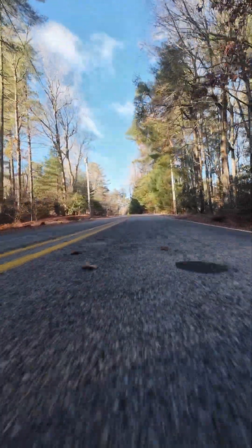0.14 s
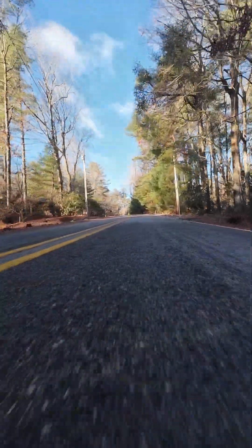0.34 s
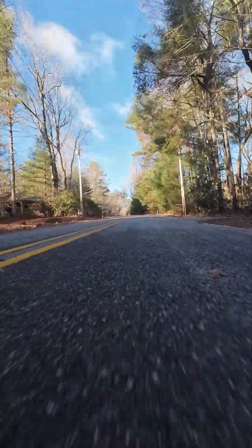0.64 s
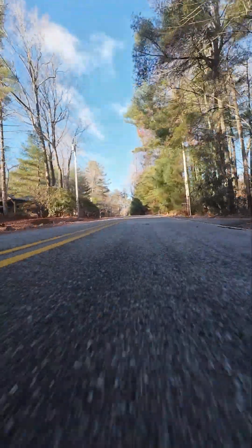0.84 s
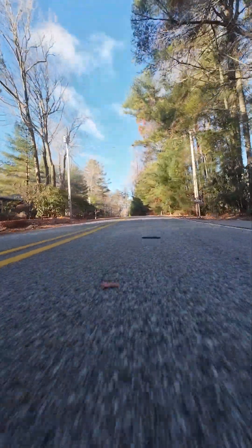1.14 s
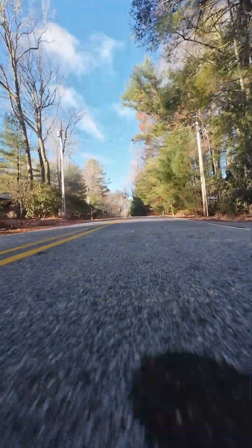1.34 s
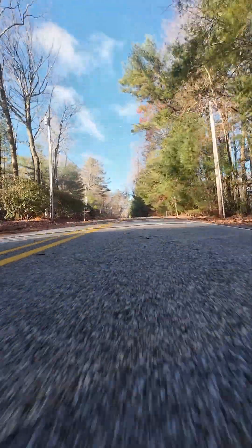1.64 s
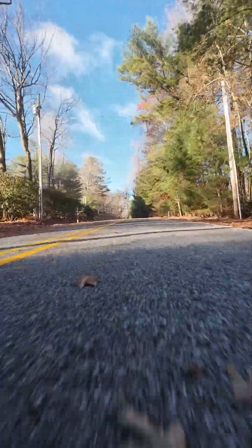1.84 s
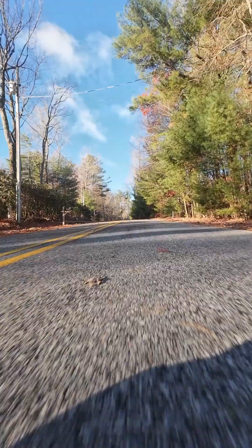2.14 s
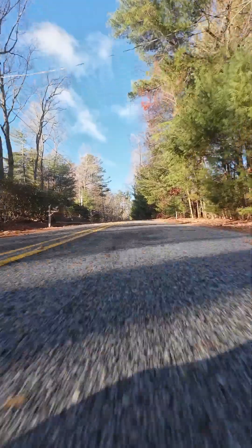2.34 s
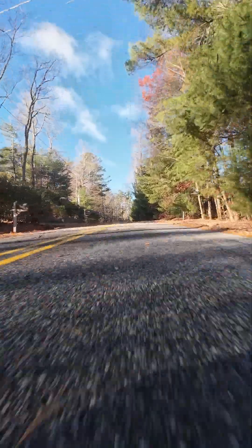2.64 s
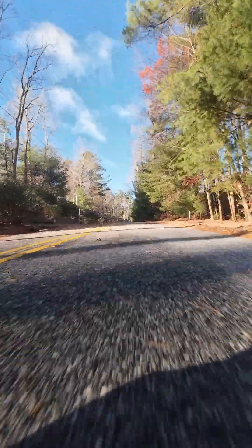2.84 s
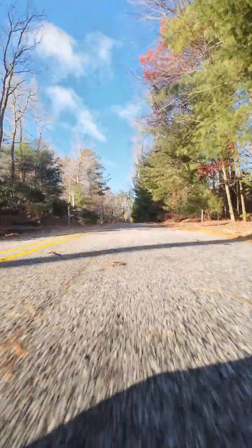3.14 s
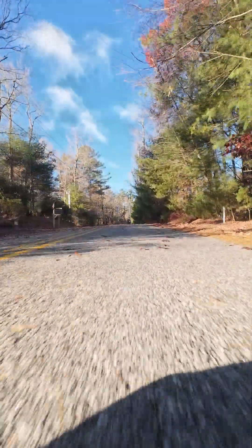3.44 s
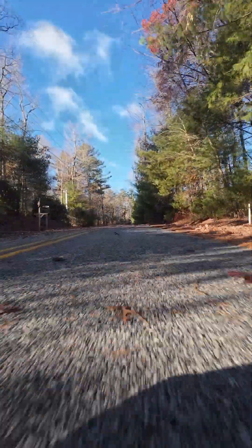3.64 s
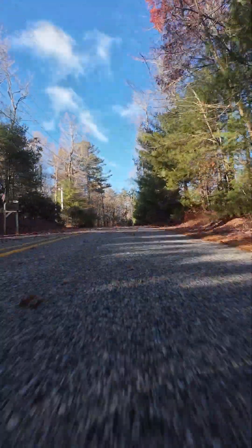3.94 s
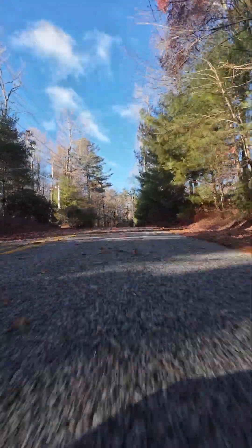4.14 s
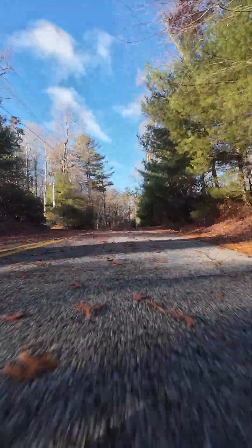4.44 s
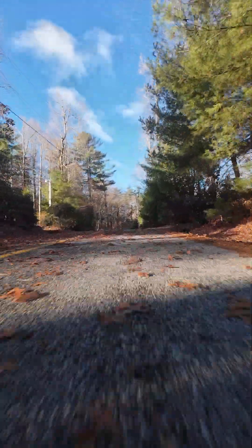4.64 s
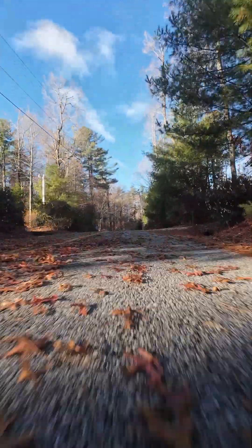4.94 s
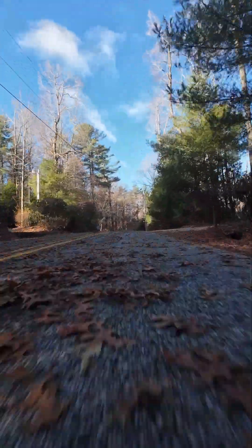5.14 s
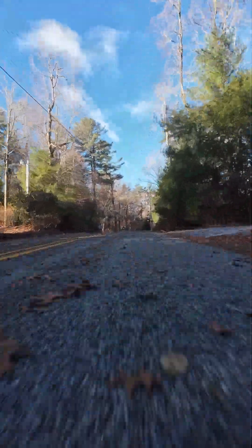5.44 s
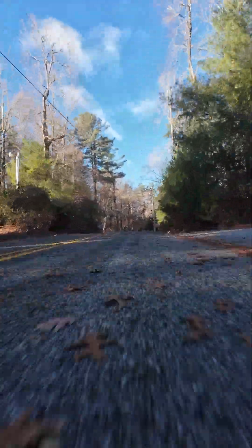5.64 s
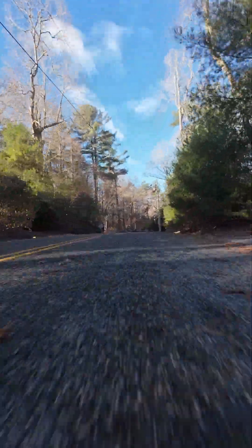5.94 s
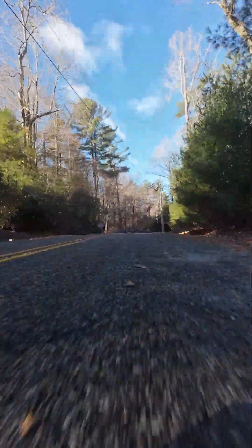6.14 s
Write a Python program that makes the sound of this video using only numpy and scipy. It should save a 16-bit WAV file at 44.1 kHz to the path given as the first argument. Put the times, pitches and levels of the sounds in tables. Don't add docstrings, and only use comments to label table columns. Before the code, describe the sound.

Very close, outdoor sound of a V8 car on coarse asphalt. Off throttle, its low exhaust hum sits behind rumbling tyres; a quick blip swells and vanishes, then the throttle opens and a warm, slightly uneven growl holds steady. Gas rasps softly at the tips. Scattered crisp leaf rustles and tiny panel ticks pepper the foreground over light gusty hiss.

```python
import sys
import numpy as np
from scipy import signal
from scipy.io import wavfile
from scipy.ndimage import uniform_filter1d

SR = 44100
rng = np.random.default_rng(int(sys.argv[2]) if len(sys.argv) > 2 else 0)


def log_audio(samples):
    frames = np.atleast_2d(samples).T
    limited = np.clip(frames, -1, 1)
    pcm = np.round(limited * 32767).astype(np.int16)
    wavfile.write(sys.argv[1], SR, pcm)


def boost(x):
    u = np.asarray(x, float) / 20
    return 10 ** u


N = 276948


def curve(table, column):
    rows = np.array(table)
    return np.interp(np.arange(N) / SR, rows[:, 0], rows[:, column])


def unit(x):
    return x / np.sqrt(np.mean(x ** 2))


def ring(x, hz, width_hz):
    return signal.lfilter(*signal.iirpeak(hz, hz / width_hz, SR), x)


def ring_twice(x, hz, width_hz):
    return ring(ring(x, hz, width_hz), hz, width_hz)


def edge(x, hz, kind, order=2):
    return signal.sosfilt(signal.butter(order, min(hz, SR / 2.2), kind, fs=SR, output="sos"), x)


def clicks(seconds, sizes):
    place = np.clip(seconds * SR, 0, N)
    whole = place.astype(int)
    part = place - whole
    out = np.bincount(whole, sizes * (1 - part), N + 2)
    return (out + np.bincount(whole + 1, sizes * part, N + 2))[:N]


def walk(rate_hz):
    hold = int(SR / rate_hz)
    steps = np.repeat(rng.standard_normal(N // hold + 1), hold)
    return unit(uniform_filter1d(uniform_filter1d(steps, hold), hold)[:N])


def warmed(x, clock):
    return np.interp(clock, np.arange(N), x)


# (time [s], firing rate [Hz])
REVS_HZ = [(0.0, 153.78), (0.821, 150.11), (1.016, 147.37), (1.151, 158.35), (1.195, 158.09),
           (1.337, 143.94), (1.511, 149.49), (1.643, 151.15), (1.943, 147.97), (2.086, 150.31),
           (2.353, 146.79), (2.717, 148.58), (2.798, 148.07), (3.45, 150.95), (4.219, 154.17),
           (5.3, 157.63), (6.28, 159.51)]


def firing_hz():
    return curve(REVS_HZ, 1)


# (time [s], exhaust level [dB])
THROTTLE_DB = [(0, -32), (.45, -32), (.7, -28), (1, -28.5), (1.07, -19.5), (1.14, -14.5), (1.21, -18),
               (1.35, -30), (1.42, -32), (1.65, -26), (1.85, -28), (2.1, -21), (2.4, -21), (2.8, -18.5),
               (4.35, -18.5), (5.4, -19.5), (6.15, -20.5), (6.28, -22)]


def exhaust_db():
    return curve(THROTTLE_DB, 1)


SHUT_DB, OPEN_DB = -27, -21


def load():
    return np.clip((exhaust_db() - SHUT_DB) / (OPEN_DB - SHUT_DB), 0, 1)


def steady_load(average_s=.6):
    return uniform_filter1d(load(), int(average_s * SR))


# (pipe [0/1], blow under load [dB], blow coasting [dB], header delay [ms], header echo [ms])
CYLINDERS = [(1.0, -4.55, 0.74, 0.99, 6.47), (0.0, -1.54, -8.67, 0.35, 5.05),
             (1.0, 4.56, -1.82, 0.71, 5.11), (1.0, -7.56, 7.6, 1.29, 6.18), (0.0, 4.05, 8.1, 0.5, 7.5),
             (1.0, -0.08, -19.97, 1.72, 4.82), (0.0, -2.23, 0.41, -0.18, 5.63),
             (0.0, 7.35, 13.63, 0.6, 6.69)]


def blowdowns(scatter_db=.3, jitter_ms=.008, first_firing=.4546):
    t = np.arange(N) / SR
    turns = np.cumsum(firing_hz()) / SR - first_firing
    firing = np.arange(int(turns[-1]))
    start_s = np.interp(firing, turns, t)
    pull = np.interp(start_s, t, load())
    pipe, load_db, coast_db, delay_ms, echo_ms = np.array(CYLINDERS)[firing % 8].T
    chance = rng.standard_normal((2, len(firing)))
    size = boost(coast_db + pull * (load_db - coast_db) + scatter_db * chance[0])
    cool_lag_ms, hot_lag_ms = -4.89, -5.22
    lag_ms = cool_lag_ms + pull * (hot_lag_ms - cool_lag_ms)
    arrive_s = start_s + (delay_ms + lag_ms + jitter_ms * chance[1]) / 1000
    echo_coast, echo_load = -.51, -.74
    echo = echo_coast + pull * (echo_load - echo_coast)
    times_s = np.concatenate([arrive_s, arrive_s + echo_ms / 1000])
    return times_s, np.concatenate([size, echo * size]), np.concatenate([pipe, pipe])


def warm_clock():
    warm_per_s, warm_from_s, neutral_s = .0044, 2.6, 3.6
    t = np.arange(N) / SR
    return np.cumsum(1 + warm_per_s * (np.maximum(t, warm_from_s) - neutral_s))


def growl_level_db(settle_samples):
    below_hz = np.minimum(firing_hz() - 152.14, 0)
    rise_db = 1.8 * below_hz + 2.5 * (1 - steady_load())
    return 1 + uniform_filter1d(rise_db, settle_samples)


def bark_level_db(settle_samples):
    level_db = exhaust_db()
    return 1 - 1.74 * np.abs(level_db - uniform_filter1d(level_db, settle_samples))


# (centre [Hz], width [Hz], signed share in pipe 0, signed share in pipe 1)
PIPES = [(85.0, 20.0, -0.019, 0.02), (86.0, 107.0, -0.052, -0.036), (151.0, 27.0, -1.0, -0.525),
         (162.0, 51.0, 0.8, 0.324), (195.0, 42.0, -0.111, 0.084), (255.0, 60.0, -0.013, -0.167),
         (305.0, 29.0, 0.045, 0.204), (332.0, 19.0, -0.197, -0.23), (385.0, 14.0, -0.047, 0.029),
         (467.0, 55.0, -0.238, -0.158), (474.0, 65.0, 0.208, 0.157), (581.0, 78.0, 0.022, -0.025),
         (611.0, 15.0, -0.025, 0.109), (659.0, 13.0, 0.038, -0.048), (711.0, 43.0, -0.013, -0.056),
         (720.0, 282.0, -0.017, 0.116), (732.0, 46.0, 0.031, 0.02), (780.0, 282.0, 0.002, -0.117),
         (786.0, 35.0, -0.091, 0.35), (791.0, 32.0, 0.054, -0.275), (882.0, 35.0, 0.017, -0.007),
         (903.0, 105.0, 0.013, 0.019), (1004.0, 39.0, 0.011, -0.067), (1010.0, 47.0, -0.004, 0.071),
         (1135.0, 140.0, 0.001, -0.009), (1213.0, 25.0, 0.002, 0.006), (1263.0, 282.0, -0.001, 0.004),
         (1366.0, 19.0, -0.005, 0.005), (1549.0, 24.0, 0.003, -0.004)]


def engine(flow=.002, settle_s=.21):
    times_s, strength, pipe = blowdowns()
    clock = warm_clock()
    hot_s = np.interp(times_s * SR, np.arange(N), clock) / SR
    rush = np.array([clicks(hot_s, strength * (pipe == k)) for k in range(2)])
    rush = rush + flow * rng.standard_normal((2, N))
    modes = [(hz, ring(a * rush[0] + b * rush[1], hz, width_hz)) for hz, width_hz, a, b in PIPES]
    boom = warmed(sum(mode for hz, mode in modes if hz < 430), clock)
    growl = sum(mode for hz, mode in modes if 430 < hz < 640)
    bark = sum(mode for hz, mode in modes if 640 < hz < 950)
    snarl_db = 2.0 + .49 * (exhaust_db() - OPEN_DB)
    snarl = boost(snarl_db) * sum(mode for hz, mode in modes if hz > 950)
    settle_samples = int(settle_s * SR)
    upper = boost(growl_level_db(settle_samples)) * growl
    upper = upper + boost(bark_level_db(settle_samples)) * (bark + snarl)
    pipes = edge(boom + warmed(upper, clock), 1700, "low", order=4)
    boom_power = uniform_filter1d(boom ** 2, size=SR // 6)
    return (pipes / np.sqrt(boom_power) + gas(clicks(times_s, strength))) * boost(exhaust_db())


def gas(blows, gas_db=-37, puff_s=.0014):
    fronts = np.maximum(blows, 0)
    noise = rng.standard_normal(N)
    puff = unit(signal.lfilter([1], [1, -np.exp(-1 / (puff_s * SR))], fronts) * noise)
    rasp = puff + .49 * unit(fronts)
    throat = 1.73 * ring_twice(rasp, 1420, 380) + 1.7 * ring_twice(rasp, 1120, 280)
    whistle_db = -.23 * np.maximum(firing_hz() - 152.9, 0)
    whistle = .5 * boost(whistle_db) * ring_twice(noise + .4 * puff, 2350, 500)
    haze = .1 * boost(-.5 * steady_load()) * ring_twice(rasp, 2900, 700)
    return boost(gas_db) * unit(edge(throat, 1400, "low") + whistle + haze)


def coloured(spectrum, lo_hz, count, flicker_db):
    hz, db = np.transpose(spectrum)
    out = 0
    for centre_hz in lo_hz * 2 ** (np.arange(count) / 3):
        band = ring_twice(rng.standard_normal(N), centre_hz, centre_hz / 3)
        band_db = np.interp(np.log(centre_hz), np.log(hz), db)
        out = out + boost(band_db + flicker_db * walk(6.1)) * band
    return unit(out)


# (frequency [Hz], density [dB per Hz])
ROAD = [(20, -3), (40, 0), (58, 6.5), (90, -6), (160, -5), (320, -1), (500, -11), (800, -10), (1150, -15),
        (1500, -26), (1900, -46), (2400, -35), (3500, -43), (7000, -58)]


def tyre_roar():
    roll_db = -42.5 + .8 * walk(3.5)
    common = boost(roll_db) * coloured(ROAD, 22, count=26, flicker_db=.7)
    apart = boost(-64.5) * coloured(ROAD[4:], 300, count=11, flicker_db=1.)
    return common + apart * np.array([[1], [-1]])


# (frequency [Hz], density [dB per Hz])
HISS = [(1650, -30), (2800, 2), (4010, -20), (5230, -16.5), (6920, -10), (8110, -4), (12900, -10),
        (15600, -20)]


def wind_hiss(level_db=-87.5):
    return boost(level_db) * coloured(HISS, 2200, count=8, flicker_db=7.5)


# (centre [s], half length [s], rustle [dB])
DRIFTS = [
    (0.402, 0.76, -79.5),
    (1.602, 0.23, -90.5),
    (2.298, 0.41, -83.5),
    (3.552, 0.44, -76),
    (5.301, .5, -76),
    (6.144, .3, -71.5),
]


def rustle_level_db(bare_db=-84.5):
    t = np.arange(N) / SR
    swells = sum(boost(db) * np.exp(-((t - s) / half_s) ** 2) for s, half_s, db in DRIFTS)
    return 20 * np.log10(boost(bare_db) + swells)


# (start [s], length [s], level [dB], brightness above 9 kHz [dB])
LEAVES = [(0, 0.036, -61, -8.5), (0.228, 0.043, -65.5, -7), (0.316, 0.022, -71, -7.5),
          (0.516, 0.021, -70.5, -2.5), (0.566, 0.03, -73.5, -0.5), (0.839, .055, -73.5, -6),
          (1.351, 0.015, -69.5, -5.5), (1.436, .024, -70.5, -2.5), (1.499, 0.023, -65, -3),
          (1.652, .095, -72, -2), (1.806, 0.05, -65.5, -7.5), (2.11, 0.031, -64, -7.5),
          (2.305, 0.046, -66, -8.5), (2.41, 0.019, -56.5, -7.5), (2.476, 0.018, -67.5, -8),
          (3.092, .035, -67, -17), (2.691, .055, -69.5, -11), (3.355, .2, -69.5, -9),
          (3.562, 0.033, -73.5, -6), (3.692, 0.043, -65, -9.5), (3.822, 0.022, -60, -9),
          (4.041, 0.037, -64, -7), (4.888, 0.059, -64.5, -6), (5.376, 0.019, -69.5, -6),
          (5.529, 0.02, -71.5, -5), (5.943, 0.035, -67, -3), (5.814, .08, -70, -5),
          (5.998, .05, -59.5, -10), (6.109, .06, -64.5, -6.5), (6.207, .07, -63, -8)]


def leaves(rustle_db, gain_db=-1, crush_s=.003, settle_s=.012):
    size_db = np.minimum(3.5 * rng.exponential(1, N), 12)
    grains_per_s = 3000
    grains = (rng.random(N) < grains_per_s / SR) * boost(size_db) * rng.standard_normal(N)
    grains = unit(unit(grains) + .38 * rng.standard_normal((2, N)))
    dull, bright = np.zeros(N), np.zeros(N)
    t = np.arange(N) / SR
    for s, length_s, db, bright_db in LEAVES:
        near = slice(max(int(s * SR) - SR // 50, 0), int((s + length_s) * SR) + SR // 20)
        age_s = t[near] - s
        attack = np.minimum(age_s, 0) / crush_s
        decay = np.maximum(age_s - length_s, 0) / settle_s
        spray = boost(db + gain_db) * np.exp(attack - decay)
        dull[near] += spray
        bright[near] += boost(bright_db) * spray
    rustle = boost(rustle_db + 2.5 * walk(27))
    patchy = boost(2.2 * walk(150))
    apart = .25 * rng.standard_normal((2, N))
    low = (dull * patchy + rustle) * grains
    body = .9 * ring(low, 3200, 1800) + ring(low, 5200, 2200) + .6 * ring(low, 8300, 2500)
    high = (bright * patchy + .4 * rustle) * (grains + apart)
    air = edge(edge(high, 8500, "high"), 11500, "low")
    return 1.165 * edge(body, 6300, "low") - 2.0 * air


def pebbles(rustle_db, per_s=25, over_db=6, spread_db=5.5):
    when, size, tone = rng.random((int(per_s * N / SR), 3)).T
    s = (np.arange(len(when)) + when) / per_s
    excess = np.minimum(-np.log(1 - size), 3)
    peak_db = rustle_db[(s * SR).astype(int)] + over_db + spread_db * excess
    return list(zip(s, peak_db, 3000 * 1.3 ** tone))


# (time [s], peak [dB], ring [Hz])
STONES = [(0.0947, -48, 3250), (0.1506, -56, 3460), (0.2798, -56.5, 3790), (0.5233, -53.5, 4120),
          (0.7077, -57, 3010), (1.4968, -47.5, 3270), (1.546, -40, 3250), (1.6999, -43, 3040),
          (1.8085, -53.5, 3350), (2.4092, -42, 5400), (2.5662, -56, 3470), (2.7818, -57.5, 3300),
          (3.114, -50.5, 3070), (3.2258, -53.5, 4970), (3.485, -47.5, 3010), (3.5255, -47.5, 3480),
          (3.685, -49.5, 3080), (3.8339, -45, 3450), (3.8736, -55, 3010), (4.0577, -48, 3030),
          (4.9085, -48, 3880), (5.3866, -54, 3060), (5.955, -45, 2940), (6.013, -41.5, 4490),
          (6.0295, -44, 5800), (6.128, -45, 4000), (6.1564, -49.5, 3090), (6.26, -47.5, 3400)]


def stones(rustle_db, gain_db=-1.5, ring_s=.0012, crack_s=.00018):
    out = np.zeros(N + SR // 50)
    age_s = np.arange(SR // 50) / SR
    flung = [(s, peak_db + gain_db, hz) for s, peak_db, hz in STONES]
    for s, peak_db, hz in flung + pebbles(rustle_db):
        crack = .8 * np.exp(-age_s / crack_s) * rng.standard_normal(len(age_s))
        overtone_hz = min(1.2 * hz, 14000)
        tone = np.sin(2 * np.pi * hz * age_s) + .76 * np.sin(2 * np.pi * overtone_hz * age_s)
        first = int(s * SR)
        out[first:first + len(age_s)] += boost(peak_db) * (crack + np.exp(-age_s / ring_s) * tone)
    ticks = edge(edge(out[:N], 1800, "high"), 13000, "low")
    return ticks * boost([[.6], [-.6]])


def scene():
    rustle_db = rustle_level_db()
    return engine() + tyre_roar() + wind_hiss() + leaves(rustle_db) + stones(rustle_db)


def roll_off(x):
    return signal.sosfilt(signal.butter(12, 15740, fs=SR, output="sos"), x)


def record(dry):
    left_hz, right_hz = 45, 215
    above = [1, 2 * np.pi * 40, (2 * np.pi * left_hz) ** 2]
    below = [1, 2 * np.pi * 304, (2 * np.pi * right_hz) ** 2]
    b, a = signal.bilinear(above, below, SR)
    return roll_off(np.array([dry[0], signal.lfilter(b, a, dry[1])]))


dry = scene()
out = record(dry)
log_audio(out)
```